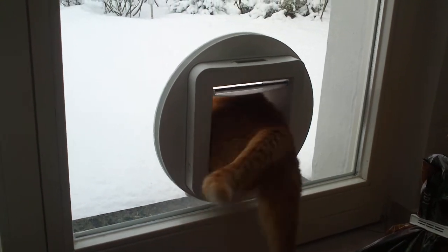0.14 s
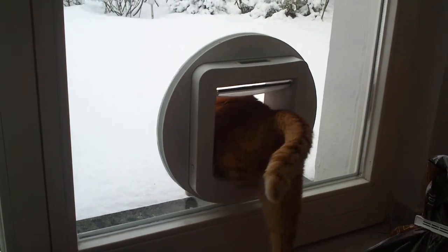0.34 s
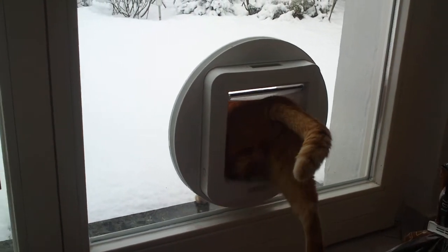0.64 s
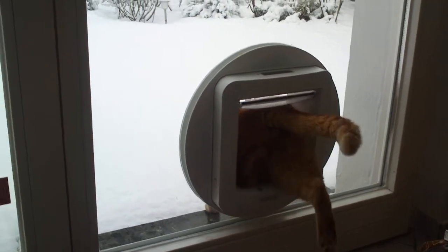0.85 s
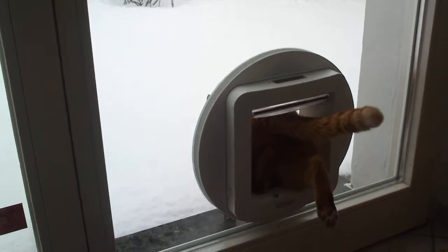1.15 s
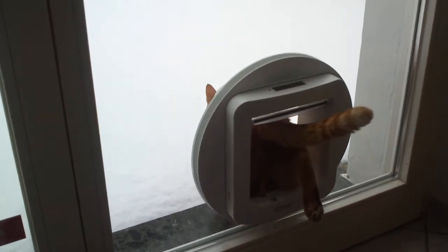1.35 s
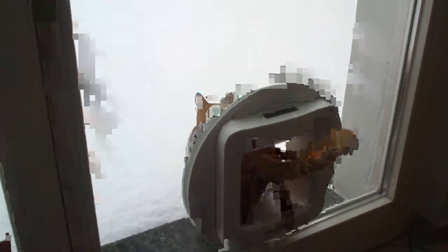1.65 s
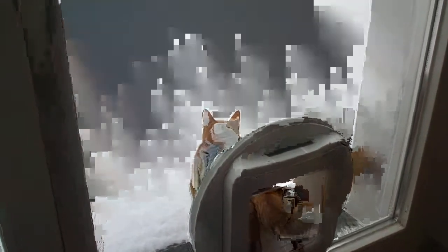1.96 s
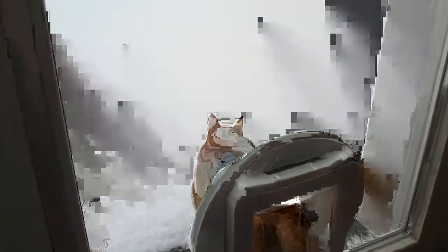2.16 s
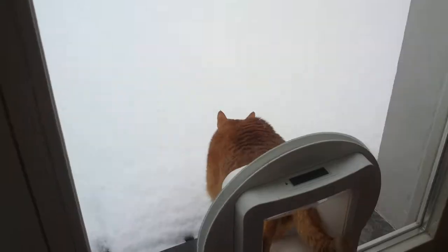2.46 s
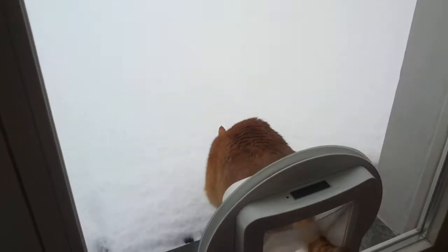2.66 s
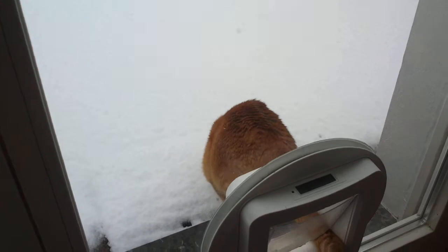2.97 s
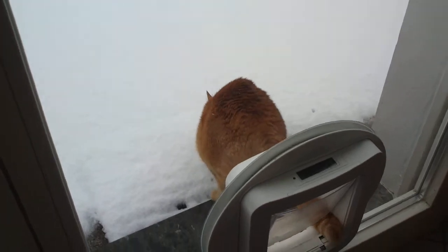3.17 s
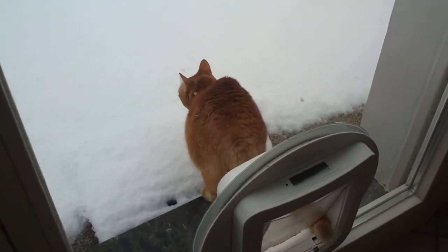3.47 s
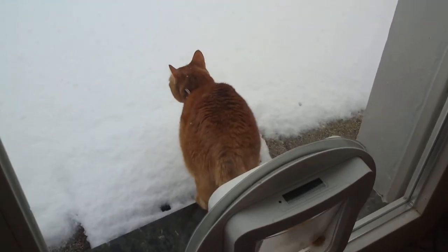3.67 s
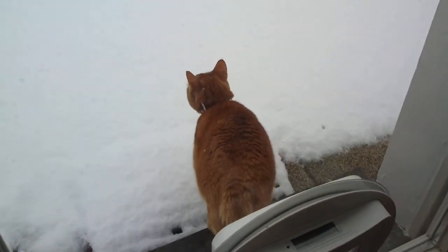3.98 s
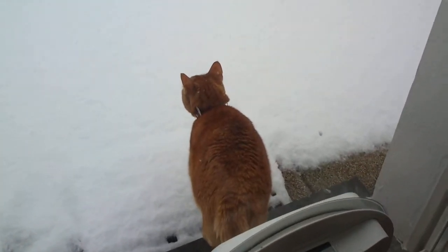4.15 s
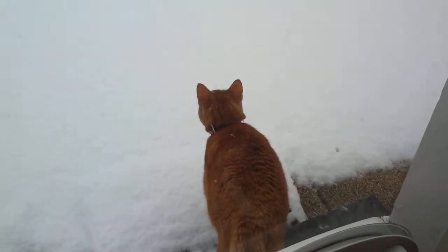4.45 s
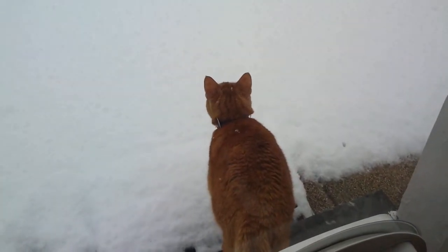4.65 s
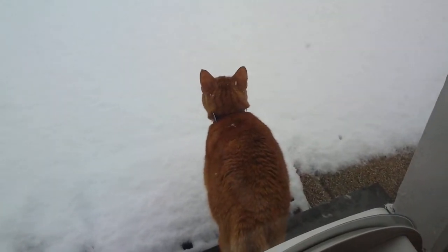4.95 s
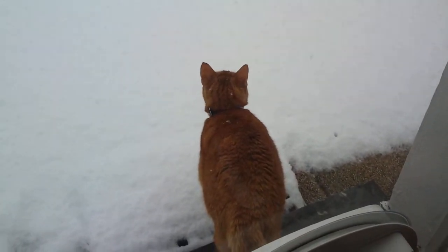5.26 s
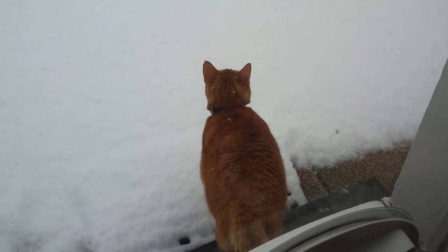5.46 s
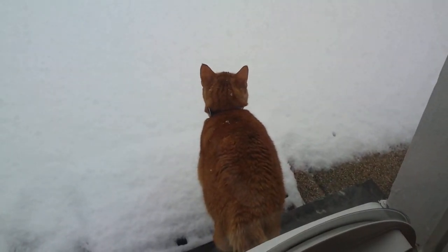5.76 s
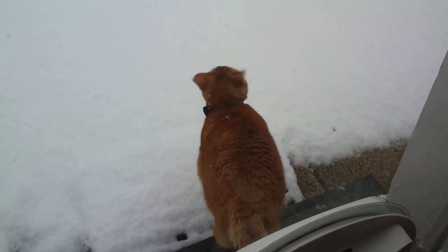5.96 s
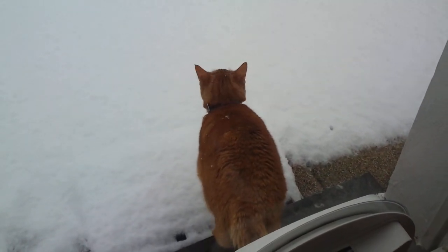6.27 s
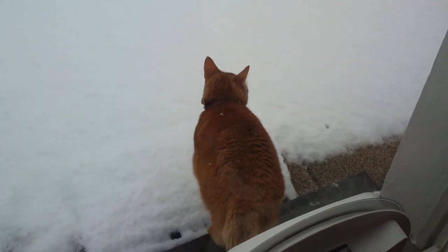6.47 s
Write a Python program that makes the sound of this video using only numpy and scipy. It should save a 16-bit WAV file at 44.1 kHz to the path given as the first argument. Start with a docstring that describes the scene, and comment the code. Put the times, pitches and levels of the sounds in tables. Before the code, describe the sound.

Close up in a quiet room with faint low rumble, a cat squeezes through a plastic flap in a glass door. Fur whispers, legs tap the frame dully, the flap's edge rubs and thumps and the pane booms deeply. The flap drops with a sharp hollow clack; after a pause the catch scrapes and snaps, and a small double knock follows.

```python
"""A cat squeezes out through a plastic flap set in a glass door, heard from the quiet room inside.
Over low rumble and hiss, fur brushes the frame as friction noise and rough low tones of the frame swell.
Legs bump it in filtered contact bursts, the flap's edge rubs over the cat and the pane booms in its modes.
The flap slides off the tail and drops with a clack; over a second later the catch scrapes and snaps shut,
and two last knocks follow. Flap and frame ring in their own modes, and the room reflects the sound."""
import sys
import numpy as np
from scipy import signal
from scipy.fft import rfft, irfft
from scipy.io import wavfile

SR = 44100
rng = np.random.default_rng(int(sys.argv[2]) if len(sys.argv) > 2 else 0)


def to_wav(sig):
    """Store sig (one row per channel, or 1-D mono) as 16-bit WAV at the path in sys.argv[1].

    Samples outside -1..1 are clipped; the rate is SR.
    """
    pcm = np.clip(np.atleast_2d(sig), -1, 1) * 32767
    pcm = np.round(pcm).astype(np.int16)
    wavfile.write(sys.argv[1], SR, pcm.T)  # frames by channels


N = 291942
TIME = np.arange(N) / SR  # s


def amp(db):
    """Level law: 20 dB is a factor of ten in amplitude."""
    return 10 ** (np.asarray(db) / 20)


def evened(x):
    """Normalization to an rms value of 1."""
    return x / np.sqrt(np.mean(x ** 2) + 1e-20)


def read(points, hz):
    """Linear interpolation of a tabulated spectrum on a log-frequency axis."""
    f, value = np.transpose(points)
    return np.interp(np.log(hz + 1), np.log(f), value)


def add(mix, s, sound):
    """Superposition: adds a sound to the mix from time s on."""
    part = mix[round(s * SR):][:len(sound)]
    part += sound[:len(part)]


def colour(x, gain_db, size=4096):
    """Minimum-phase filtering: folding the cepstrum makes a causal response of the given gain."""
    log_gain = np.log(amp(gain_db(np.fft.rfftfreq(size, 1 / SR))))
    cepstrum = irfft(log_gain)
    cepstrum[1:size // 2] *= 2
    cepstrum[size // 2 + 1:] = 0
    response = irfft(np.exp(rfft(cepstrum)))
    return signal.oaconvolve(x, response)[:len(x)]


def narrow_noise(n, hz, half_width):
    """Resonance: noise in one narrow band, at half amplitude half_width Hz off centre; rms 1."""
    f = np.fft.rfftfreq(n, 1 / SR)
    resonance = 1 / (1 + ((f - hz) / half_width) ** 2)
    return evened(irfft(rfft(rng.standard_normal(n)) * resonance, n))


def thud(hz, corner_hz=450):
    """Low-pass weighting: the share of a frequency that belongs to the heavy, low part of a sound."""
    return 1 / (1 + (hz / corner_hz) ** 3)


def friction(per_s, spread_db, smooth):
    """Stick-slip friction: tiny random slips of uneven size over a smooth hiss, rms 1."""
    happens = rng.random(N) < per_s / SR
    sign = rng.choice([-1, 1], N)
    size = amp(spread_db * np.minimum(rng.exponential(1, N), 3))
    slips = evened(happens * sign * size)
    return evened(slips + smooth * rng.standard_normal(N))


def stroke(start, length, attack_s, slope_db_per_s, release_db_per_s):
    """Envelope of one rubbing movement: gain rises, drifts steadily in dB, and decays exponentially."""
    t = np.maximum(TIME - start, 0)
    drift_db = slope_db_per_s * np.minimum(t, length)
    release_db = release_db_per_s * np.maximum(t - length, 0)
    return np.minimum(t / attack_s, 1) * amp(drift_db - release_db)


def reflections(build_s=0.0039, near_db=6, near_t60=0.12, size=256):
    """Reverberation: a dense flurry from the door recess and the room's tail, decaying by band; energy 1."""
    # reverberation time: f/Hz, t60/s
    room_decay = [(100, 0.41), (300, 0.49), (1000, 0.38), (3000, 0.38), (6500, 0.3), (9000, 0.23),
                  (15000, 0.19)]
    t = TIME[:SR // 2]
    build = 1 - np.exp(-(t / build_s) ** 2)
    recess = amp(near_db - 60 * t / near_t60)
    flurry = rng.standard_normal(len(t)) * build * (1 + recess)
    hz, at, z = signal.stft(flurry, SR, nperseg=size)
    decay = amp(-60 * at / read(room_decay, hz)[:, None])
    tail = signal.istft(z * decay, SR, nperseg=size)[1][:len(t)]
    return tail / np.linalg.norm(tail)


def room(x, wet_db):
    """Convolution: a lasting sound together with its reflections."""
    return x + amp(wet_db) * signal.oaconvolve(x, reflections())[:N]


def contact(ring, t60, wet_db, spread_s=0.000487):
    """Impact: a hard tick, the dense ring spreading through thin plastic, and this spot's reflections."""
    t = TIME[:SR // 2]
    burst = rng.standard_normal(len(t)) * amp(-60 * t / t60) * (1 - np.exp(-t / spread_s))
    burst *= ring / np.linalg.norm(burst)  # ring relative to the tick
    burst[0] = 1  # the tick
    return burst / np.linalg.norm(burst) + amp(wet_db) * reflections()


def blow(db, thud_db, click_db, spot_hz, spot_db, spot_octaves=0.26, click_hz=3800, ring_db_per_db=0.18):
    """Impact spectrum: weight, hardness and struck spot set the colour; light blows stay short and dry."""
    # basic colour of a blow: f/Hz, gain/dB
    blow_colour = [(40, -20), (140, 2.5), (400, 0), (900, 1.5), (2000, -4.5), (4000, -8), (7100, -6.5),
                   (8000, -21.5), (11000, -29), (15000, -46)]

    def gain_db(hz):
        """Spectral weighting: thud, click and the spot's resonance added in dB."""
        spot = np.exp(-.5 * (np.log2((hz + 1) / spot_hz) / spot_octaves) ** 2)
        weight = thud_db * thud(hz)
        hardness = click_db * (1 - thud(hz, click_hz))
        return read(blow_colour, hz) + weight + hardness + spot_db * spot

    hit = contact(ring=2.64 * amp(ring_db_per_db * db), t60=0.031, wet_db=-4 + 0.08 * db)
    return amp(db) * colour(hit, gain_db)


def frame(x):
    """Modal resonance: flap and frame add their own ringing modes to whatever shakes them."""
    # modes of flap and frame: f/Hz, gain at resonance/dB, t60/s
    frame_modes = [(141.7, 9.5, 0.31), (182, 2, 0.83), (269.6, -19, .34), (366, -4, .4), (451, -13.5, 0.74),
                   (468, -3, 0.26), (661, -9, 0.31), (664, -6, 0.25), (780, -1.5, .16), (878, -7, .11),
                   (1250, -3, 0.098), (1502, -5, 0.13), (1649, 2.5, 0.39), (2430, -6.5, .14),
                   (2633, -13.5, 0.14), (3110, -2.5, .15), (4070, -12.5, .15), (5590, -9.5, 0.14),
                   (6200, -8, .2), (6000, -2, 0.13), (6610, 1, 0.11)]
    t = TIME[:SR // 2]
    ring = np.zeros(len(t))
    for hz, db, t60 in frame_modes:
        unit_peak = 2 * np.log(1000) / (t60 * SR)  # gain 1 at resonance
        ring += amp(db - 60 * t / t60) * np.cos(2 * np.pi * hz * t) * unit_peak
    return x + signal.oaconvolve(x, ring)[:N]


def house(air_db=-56.0):
    """Stationary noise: steady low rumble, thin hiss and a few wavering narrow-band drones."""
    # relative spectrum of rumble and hiss: f/Hz, level/dB
    air_spectrum = [(10, -5.5), (25, 0), (70, -1), (110, -12), (200, -15.5), (300, -22), (450, -28.5),
                    (1000, -33), (2500, -37), (8000, -42), (15000, -45)]
    # faint drones: f/Hz, full width at half amplitude/Hz, rms level/dB
    drone_bands = [(88.9, 10, -62), (133, 7, -75.5), (196.4, 23, -73), (290.3, 19, -72.5),
                   (9400, 23.86, -98.5)]
    gain = amp(read(air_spectrum, np.fft.rfftfreq(N, 1 / SR)))
    air = irfft(rfft(rng.standard_normal(N)) * gain, N)
    drones = sum(amp(db) * narrow_noise(N, hz, width / 2) for hz, width, db in drone_bands)
    return amp(air_db) * evened(air) + drones


def fur():
    """Friction noise: fur whispers in a light touch, and in a stroke as each part of the cat passes."""
    # strokes along the frame, haunches to tail: start t/s, length/s, level before sag and colour/dB
    fur_strokes = [(0.123, 0.11, -69), (0.93, 1.05, -68), (2.142, 0.29, -65), (2.72, 0.35, -69.5),
                   (3.322, 0.039, -68), (3.783, 0.28, -67.5)]
    # colour of fur: f/Hz, gain/dB
    fur_colour = [(100, 7), (600, 5.5), (1200, -0.5), (2500, -0.5), (4500, -1), (6500, 5), (7300, -2),
                  (8500, -20), (15000, -31.5)]
    attack_s, sag_db_per_s, release_db_per_s = 0.056, 3, 48.5
    touch_db, touch_ends_s = -74.5, 4.3  # until the cat is clear
    levels = [amp(touch_db) * stroke(0, touch_ends_s, attack_s, 0, release_db_per_s)]
    for s, length, db in fur_strokes:
        levels.append(amp(db) * stroke(s, length, attack_s, -sag_db_per_s, release_db_per_s))
    level = np.max(levels, axis=0)
    whisper = level * friction(per_s=3200, spread_db=8.5, smooth=1.5)
    return colour(whisper, lambda hz: read(fur_colour, hz))


def low_tones(octave_db=-14, rough=0.38):
    """Damped resonance: a rough low tone and its octave swell, then decay exponentially."""
    # rough low tones of the frame: groans, a dull thud and a short scrape before the clack:
    # t/s of the peak, level of the tone/dB, rise time constant/s, t60/s, f/Hz
    frame_tones = [(0.188, -51, 0.028, 0.31, 377), (2.302, -50.5, 0.0072, 0.41, 155.4),
                   (2.316, -47, 0.012, 0.28, 223.3), (2.823, -43.5, 0.018, 0.44, 142.4),
                   (3.921, -56, 0.0077, 0.092, 528)]
    out = np.zeros(N)
    t = TIME[:SR // 2] - .1  # zero at the peak
    for s, db, rise, t60, hz in frame_tones:
        swell = np.exp(np.minimum(t, 0) / rise) * amp(-60 * np.maximum(t, 0) / t60)
        octave = amp(octave_db) * narrow_noise(len(t), 2 * hz, half_width=150)
        tone = np.sin(2 * np.pi * hz * t) + octave
        roughness = rough * narrow_noise(len(t), hz, half_width=100)
        add(out, s + t[0], amp(db) * swell * (tone + roughness))
    return out


def knocks():
    """Successive impacts: the distinct blows of cat on frame and of flap on frame."""
    # blows: t/s, strength/dB, extra thud/dB, extra click/dB, struck spot f/Hz, boost at the spot/dB
    frame_blows = [(0.247, -26.5, -7, -2, 2900, 6), (0.7297, -21.5, 1, -1.5, 1530, 10),
                   (0.831, -25.5, 8, 10, 1660, 14), (0.838, -28.5, 1, 3, 694, 14.5),
                   (1.43, -30, 11, -8, 1000, 1), (1.887, -28.5, 7, -12, 1000, 0),
                   (2.27, -19.5, 2, -14, 1200, 1), (2.286, -13.5, 5, -1, 900, 1.5),
                   (2.296, -15, 5, -17, 464, 5.5), (2.382, -25, -13, 8, 4250, 6.5),
                   (2.877, -10.5, 1, 0, 1410, 5.5), (3.032, -30, 10, -7, 2520, 12.5),
                   (3.9308, -17, -7, -9, 1380, 10.5), (3.933, -23, 8, -2, 7370, 14.5),
                   (3.9865, -0.5, 1.5, 5, 494, 1.5), (3.989, 1, -6, 0, 2050, 7),
                   (3.9959, -11.5, 8.5, 7, 610, 14), (4.031, -13, 14.5, 1.5, 1230, 4.5),
                   (4.385, -25.5, -4, -6, 1200, 1), (4.443, -29, 1, -12, 1600, 5.5),
                   (5.983, -23, -8, 8.5, 770, 11), (5.9901, -15, -10, -10, 1340, 7)]
    out = np.zeros(N)
    for s, *how in frame_blows:
        add(out, s, blow(*how))
    return out


def jostle(count=9, spread_db=5.5, octaves=0.8):
    """Random impacts: the hind legs jostle the frame in faint dull taps at chance moments and spots."""
    centre_s, spread_s, centre_db, centre_hz = 1.46, 0.22, -34, 1000
    out = np.zeros(N)
    for when, size, spot in 2 * rng.random((count, 3)) - 1:
        spot_hz = centre_hz * 2 ** (octaves * spot)
        tap = blow(centre_db + spread_db * size, thud_db=7, click_db=-5, spot_hz=spot_hz, spot_db=4)
        add(out, centre_s + spread_s * when, tap)
    return out


def drag():
    """Stick-slip: the flap's edge judders over the cat in a few rubs, each with its own share of low thud."""
    # rubs: start t/s, length/s, level before sag and colour/dB, extra thud/dB
    edge_rubs = [(2.722, 0.05, -43, -19), (2.785, 0.053, -45, -1), (2.822, 0.025, -44, -13),
                 (2.917, 0.04, -54, 3)]
    # colour of the dragging flap: f/Hz, gain/dB
    drag_colour = [(50, -21), (140, 9), (280, 15.5), (480, 11.5), (750, 3.5), (1100, 2), (1500, -4),
                   (2500, -12.5), (6300, -13.5), (8000, -30), (15000, -53)]
    attack_s, sag_db_per_s, release_db_per_s = 0.012, 14, 262
    judder = colour(friction(per_s=1200, spread_db=6.0, smooth=0.96), lambda hz: read(drag_colour, hz))
    low = irfft(rfft(judder) * thud(np.fft.rfftfreq(N, 1 / SR)), N)
    out = np.zeros(N)
    for s, length, db, thud_db in edge_rubs:
        level = amp(db) * stroke(s, length, attack_s, -sag_db_per_s, release_db_per_s)
        out += level * (judder + (amp(thud_db) - 1) * low)
    return out


def pane():
    """Forced modal response: a smooth shove sets the glass booming; a shorter one reaches higher modes."""
    # shoves that flex the pane: t/s, impulse level/dB, length/s
    pane_shoves = [(3.102, -19.5, 0.046), (3.351, -40.5, 0.017), (3.977, -27, 0.014),
                   (3.987, -46.5, 0.0024)]
    # modes of the pane: f/Hz, level/dB, t60/s
    pane_modes = [(30.4, -2, 1.78), (26.5, -20, .6), (52.7, -6.5, 0.78), (96, -2.5, 0.8), (143, -2, 0.25),
                  (184, 5, 0.25), (317.5, 11, 0.24)]
    force = np.zeros(N)
    for s, db, length in pane_shoves:
        push = np.hanning(int(length * SR))
        add(force, s, amp(db) * push / push.sum())
    t = TIME[:2 * SR]
    boom = sum(amp(db - 60 * t / t60) * np.cos(2 * np.pi * hz * t) for hz, db, t60 in pane_modes)
    return signal.oaconvolve(force, boom)[:N]


def catch():
    """Friction, then impact: the catch scrapes along, pressed ever harder, and chatters home in bright snaps."""
    # snaps: t/s, strength/dB
    catch_snaps = [(5.4840, -6.5), (5.4850, -4), (5.4860, 4.5), (5.4878, 0), (5.4977, -13.5), (5.502, -14)]
    # colour of the snaps: f/Hz, gain/dB
    snap_colour = [(60, -19), (170, -2.5), (310, -7.5), (500, 2.5), (750, 6), (1050, 0), (1600, 2),
                   (2200, -3), (4800, -0.5), (5700, 8), (7100, 7.5), (8000, -7.5), (11000, -19),
                   (15000, -31.5)]
    # colour of the scrape: f/Hz, gain/dB
    slide_colour = [(100, -16), (700, 5.5), (2000, -1), (5000, -1), (7000, 2.5), (8000, -11.5),
                    (11000, -29), (15000, -44.5)]
    start_s, slide_db, attack_s, swell_db_per_s, release_db_per_s = 5.446, -42, 0.0032, 119, 5000.5
    snaps = np.zeros(N)
    for s, db in catch_snaps:
        add(snaps, s, amp(db) * contact(ring=0.89, t60=0.025, wet_db=-5.5))
    length = catch_snaps[0][0] - start_s  # up to the first snap
    push = stroke(start_s, length, attack_s, swell_db_per_s, release_db_per_s)
    scrape = amp(slide_db) * push * friction(per_s=4200, spread_db=4.0, smooth=1.1)
    slide = colour(room(scrape, wet_db=-6), lambda hz: read(slide_colour, hz))
    return colour(snaps, lambda hz: read(snap_colour, hz)) + slide


def scene():
    """Superposition: blows, catch and rubbing ring the frame; low tones, pane and house are added."""
    rubbing = room(fur() + drag(), wet_db=-4.5)
    shaken = knocks() + jostle() + catch() + rubbing
    return (frame(shaken) + low_tones() + pane() + house())[None]


def record(dry):
    """Band limitation: a linear-phase low-pass filter removes the highest treble."""
    low_pass = signal.firwin(511, 15600, window=("kaiser", 9), fs=SR)  # cutoff in Hz
    return signal.oaconvolve(dry, low_pass[None], "same")


dry = scene()
out = record(dry)
to_wav(out)
```